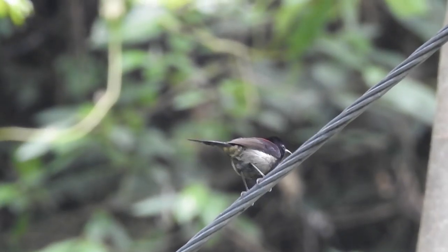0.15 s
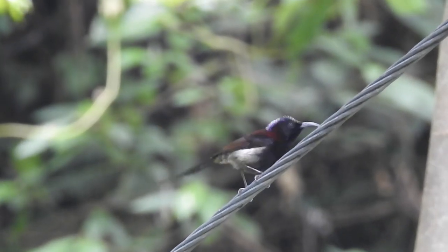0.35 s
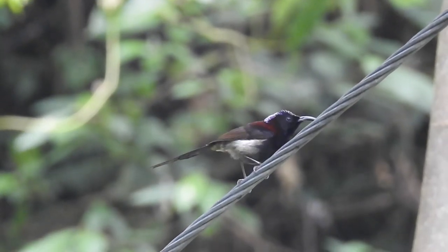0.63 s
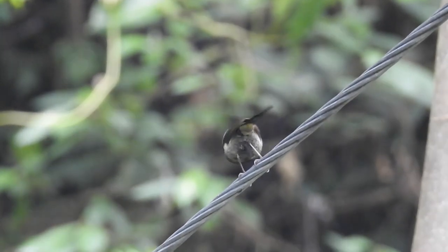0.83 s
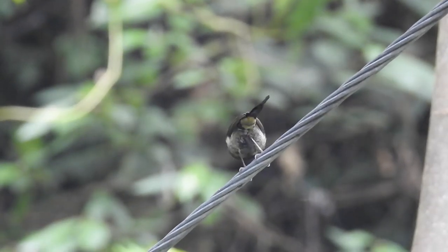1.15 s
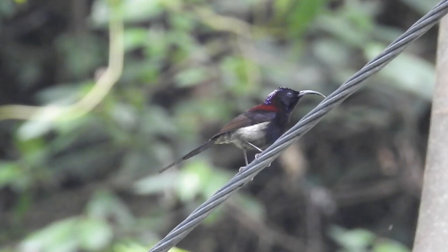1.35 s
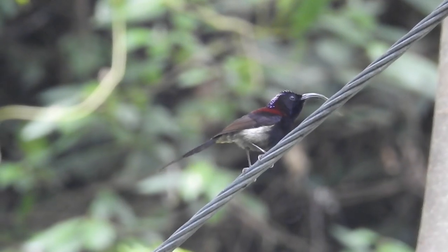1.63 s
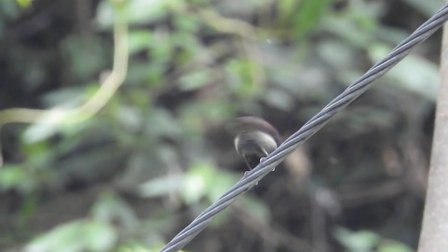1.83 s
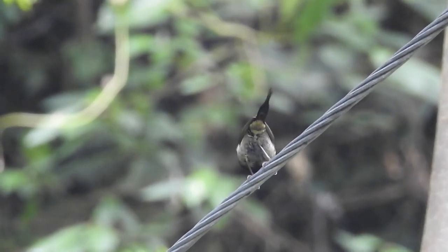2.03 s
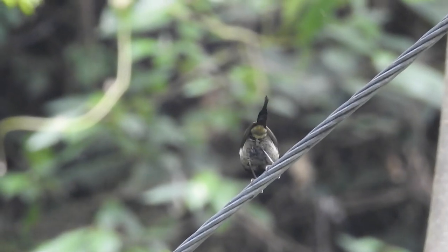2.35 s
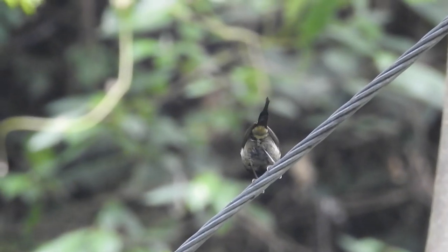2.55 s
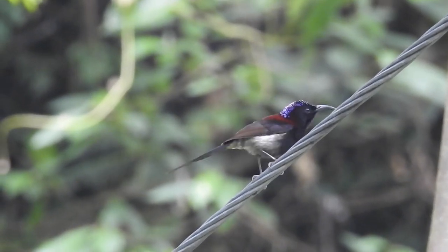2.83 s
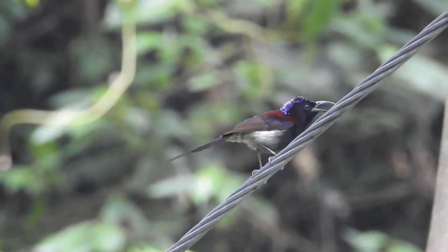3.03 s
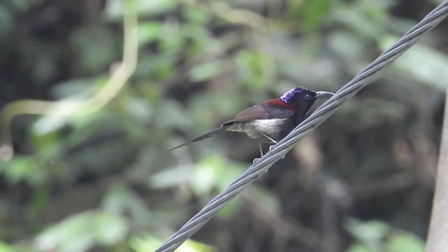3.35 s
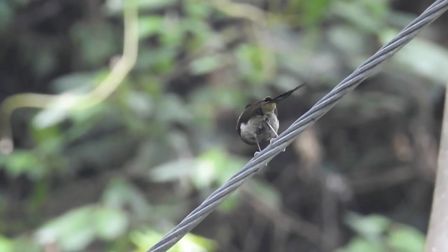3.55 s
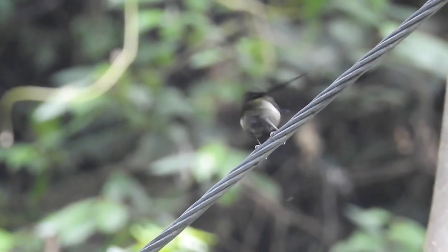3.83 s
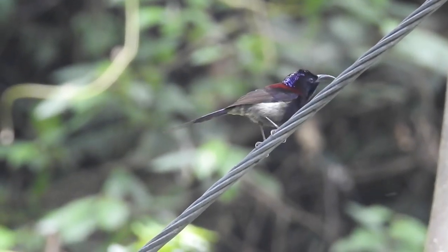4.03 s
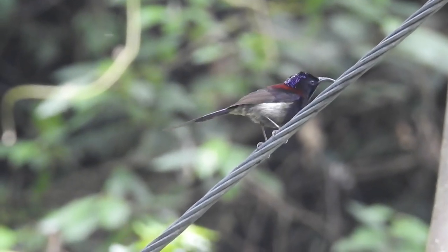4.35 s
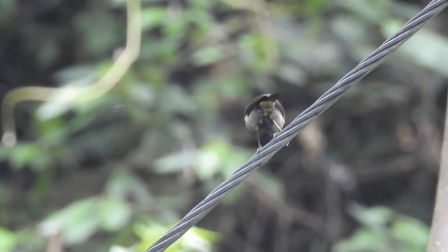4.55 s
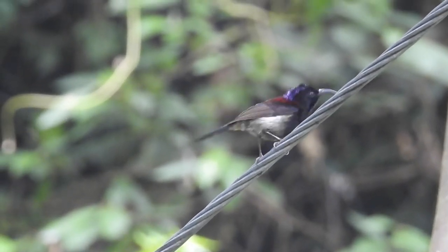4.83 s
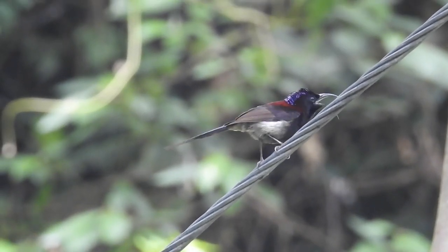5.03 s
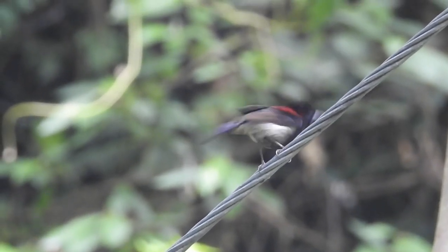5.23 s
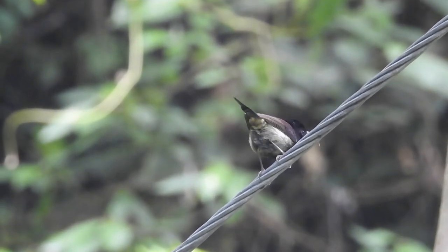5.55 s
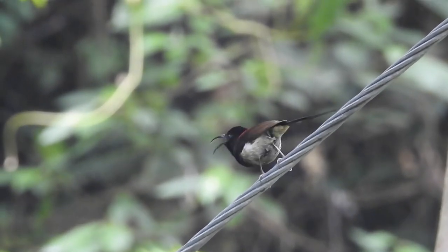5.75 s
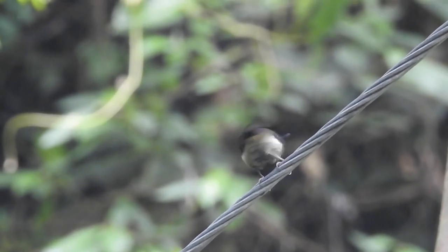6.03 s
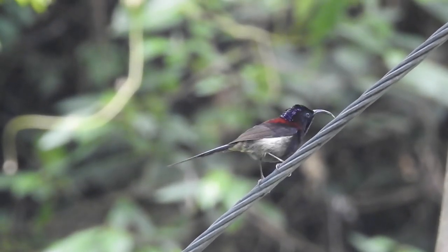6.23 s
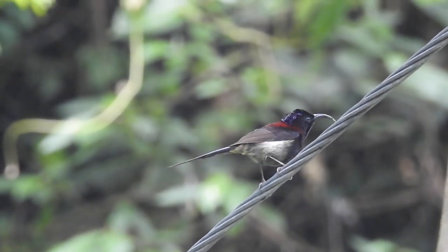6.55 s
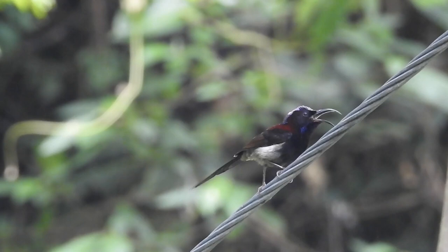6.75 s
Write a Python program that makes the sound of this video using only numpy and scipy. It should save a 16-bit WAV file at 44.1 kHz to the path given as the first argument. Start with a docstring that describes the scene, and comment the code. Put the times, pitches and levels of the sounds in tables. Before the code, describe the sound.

A small sunbird on a wire gives thin piercing whistles and sharp chips while other birds ticking and whistling sound behind, over steady insect hiss.

```python
"""On a wooded slope a sunbird on a wire calls in thin arched whistles, slurs and sharp double chips.
Each note is a gliding sine, and decaying random echoes stand for scatter in the foliage.
Farther off, other birds tick, pip, trill and whistle two climbing series, made the same way.
Insects hiss steadily near 6 kHz above a low, distant rumble; both are noise shaped by a spectrum."""
import sys
import numpy as np
from scipy import signal
from scipy.fft import rfft, irfft, next_fast_len
from scipy.io import wavfile
from scipy.ndimage import uniform_filter1d, minimum_filter1d, map_coordinates

SR = 44100
rng = np.random.default_rng(int(sys.argv[2]) if len(sys.argv) > 2 else 0)


def transcribe(u):
    """Save the signal u as a 16-bit wav file named by the first command-line argument.

    u: samples, shape (n,) or (channels, n), limited to [-1, 1]; the rate is SR.
    q: integer samples, one column per channel.
    """
    v = np.clip(np.atleast_2d(u).T, -1, 1)
    q = np.round(v * 32767).astype(np.int16)
    wavfile.write(sys.argv[1], SR, q)


N = 303408

# In every note table, pitch and level are references that the note's shape multiplies and offsets.


def sunbird():
    """Superposition: whistles, slurs and chips add linearly, then lean left by a level difference."""
    whistles = arched_whistles() + high_whistles() + lifting_whistles()
    return panned(whistles + slurs() + double_chips() + drops(), left_db=2.5)


# Arched glide. Each row: share of the note's length, pitch ratio, level in dB.
ARCH_SHAPE = [(0, .73, -30), (.09, .86, -13), (.18, .955, -3), (.3, 1.003, .5), (.6, .998, -1),
              (.86, .988, 0), (.95, .97, -1), (1, .9, -12)]
# Arched whistles. Each row: start in seconds, pitch in Hz, level in dB.
ARCHES = [(0.889, 6326, -9.5), (2.167, 6410, -10), (3.049, 6252, -10.5), (3.825, 6197, -9),
          (4.02, 6280, -12), (6.143, 6284, -9.5)]
ARCH_S = .099


def arched_whistles():
    """Frequency modulation: the pitch rises fast, is held, and sags at the end."""
    rows = [(s, ARCH_S, hz, db) for s, hz, db in ARCHES]
    return calls(ARCH_SHAPE, rows, waver=.0035, wet_db=0, late_db=-6, rasp=.015)


# Glide that starts high. Each row: share of the note's length, pitch ratio, level in dB.
HIGH_SHAPE = [(0, 1.07, -24), (.07, 1.055, -11), (.15, 1, -4), (.27, .992, -2), (.45, 1.002, 0),
              (.68, .988, -3), (.8, .975, 0), (.92, .95, 0), (1, .955, -10)]
# High whistles. Each row: start in seconds, length in seconds, pitch in Hz, level in dB.
HIGH_NOTES = [(1.934, 0.13, 7540, -9.5), (3.592, 0.14, 7442, -11.5), (6.74, .137, 7387, -10.5)]


def high_whistles():
    """Frequency modulation: the pitch falls early, is nearly held, and falls again."""
    return calls(HIGH_SHAPE, HIGH_NOTES, waver=.002, wet_db=-3, late_db=-7)


# Rising glide. Each row: share of the note's length, pitch ratio, level in dB.
LIFT_SHAPE = [(0, .88, -24), (.14, .94, -8), (.3, .97, -2), (.6, .995, -3), (.88, 1.01, 1), (1, 1, -16)]
# Lifting whistle. Each row: start in seconds, length in seconds, pitch in Hz, level in dB.
LIFT_NOTES = [(5.051, .092, 7366, -11)]


def lifting_whistles():
    """Frequency modulation: the pitch climbs for most of the note."""
    return calls(LIFT_SHAPE, LIFT_NOTES, waver=.002, wet_db=-1, late_db=-5)


# Warbling and sweeping glides. Each row: share of the note's length, pitch ratio, level in dB.
WARBLE_SHAPE = [(0, .87, -18), (.13, .93, -7), (.26, .875, -8), (.42, .9, -5), (.57, 1.02, -3), (.85, 1, 0),
                (.93, .99, 0), (1, .95, -12)]
SWEEP_SHAPE = [(0, .62, -20), (.07, .68, -15), (.13, .77, -12), (.2, .97, -5), (.3, 1.01, -1),
               (.5, 1.06, 0), (.7, 1.14, -6), (.9, 1.24, -7), (1, 1.23, -20)]
# Slurs of each shape. Each row: start in seconds, length in seconds, pitch in Hz, level in dB.
WARBLE_NOTES = [(0.516, .098, 5906, -11), (4.798, .115, 5938, -10)]
SWEEP_NOTES = [(0.475, 0.18, 5977, -13)]


def slurs():
    """Frequency modulation: wide glides, with a stronger random waver than the held whistles."""
    warbles = calls(WARBLE_SHAPE, WARBLE_NOTES, waver=.0071, wet_db=-.5, late_db=-4.5)
    sweeps = calls(SWEEP_SHAPE, SWEEP_NOTES, waver=.0089, wet_db=5.5, late_db=-9)
    return warbles + sweeps


# Lead-in and upward flick. Each row: share of the note's length, pitch ratio, level in dB.
LEAD_SHAPE = [(0, .73, -18), (.2, .93, -2), (.4, 1, 0), (.7, 1.09, -2), (.85, 1.2, -13), (1, 1.4, -24)]
FLICK_SHAPE = [(0, .69, -14), (.3, .87, 4), (.52, 1, 7), (.72, 1.09, 10), (.9, 1.16, 5), (1, 1.13, -14)]
# Double chips. Each row: start of the lead-in in seconds, its pitch in Hz, its level in dB.
DOUBLE_CHIPS = [(-.2, 7050, -13.5), (.326, 6760, -16), (2.789, 6270, -15), (4.619, 6480, -14.5),
                (5.83, 6340, -16)]
LEAD_S, FLICK_AFTER_S, FLICK_S, FLICK_HZ = .045, .041, .028, 6490
FLICK_DB = -3.5  # relative to the lead-in's reference level


def double_chips():
    """Transient pairs: a short rising lead-in, then a faster upward flick on a fixed pitch."""
    lead_rows = [(s, LEAD_S, hz, db) for s, hz, db in DOUBLE_CHIPS]
    flick_rows = [(s + FLICK_AFTER_S, FLICK_S, FLICK_HZ, db + FLICK_DB) for s, _, db in DOUBLE_CHIPS]
    leads = calls(LEAD_SHAPE, lead_rows, waver=.035, wet_db=3, late_db=-16, rasp=.21)
    flicks = calls(FLICK_SHAPE, flick_rows, waver=.015, wet_db=1.5, late_db=-8, rasp=.11)
    return leads + flicks


# Falling glide. Each row: share of the note's length, pitch ratio, level in dB.
DROP_SHAPE = [(0, 1.6, -26), (.2, 1.28, -7), (.32, 1.08, 0), (.55, .9, -1), (.75, .83, -6), (1, .81, -18)]
# Drops. Each row: start in seconds, length in seconds, pitch in Hz, level in dB.
DROP_NOTES = [(1.546, .038, 5440, -13), (5.333, .046, 5370, -16)]


def drops():
    """Frequency modulation: a short note falls to about half its starting pitch."""
    return calls(DROP_SHAPE, DROP_NOTES, waver=.025, wet_db=0, late_db=-7, rasp=.12)


def other_birds():
    """Superposition: the neighbours' notes add linearly, then lean left by a level difference."""
    short_notes = ticks() + chips() + rasps() + pips()
    long_notes = peeps() + piping_trill() + climbing_whistles() + thin_whistles()
    return panned(short_notes + long_notes, left_db=2.4)


# Tick that falls and fades. Each row: share of the note's length, pitch ratio, level in dB.
TICK_SHAPE = [(0, 1.0, -16), (.15, 1.015, 0), (.4, .975, 0), (.58, .85, -13), (.8, .68, -23), (1, .52, -33)]
# Ticks. Each row: start in seconds, length in seconds, pitch in Hz, level in dB.
TICK_NOTES = [(.949, .028, 4450, -13), (1.012, .029, 4370, -14), (1.108, .029, 4500, -14),
              (1.192, .027, 4500, -14.5)]


def ticks():
    """Direct-to-reverberant ratio: weak scatter makes four ticks sound dry and close."""
    return calls(TICK_SHAPE, TICK_NOTES, waver=.014, wet_db=-3.5, late_db=-5, rasp=.1, side_db=-11)


# Chips. Each row: start in seconds, length in seconds, pitch in Hz, level in dB.
CHIP_NOTES = [(1.622, 0.034, 3900, -34.5), (1.695, .022, 6035, -33.5), (1.697, .018, 3210, -43),
              (5.411, .022, 3800, -37)]


def chips():
    """Direct-to-reverberant ratio: scatter above the direct sound sets these flicks deep in the trees."""
    return calls(FLICK_SHAPE, CHIP_NOTES, waver=.027, wet_db=3.5, late_db=-5.5, rasp=.16)


# Rising pip. Each row: share of the note's length, pitch ratio, level in dB.
PIP_SHAPE = [(0, .85, -12), (.35, .94, -1), (.7, .99, 0), (1, 1.02, -7)]
# Rasps. Each row: start in seconds, length in seconds, pitch in Hz, level in dB.
RASP_NOTES = [(1.84, .045, 5690, -26), (2.059, 0.047, 4370, -41), (2.383, 0.14, 4866, -36),
              (3.619, .05, 3400, -47.5), (5.527, 0.023, 5310, -25.5), (6.817, 0.027, 6120, -21.5)]


def rasps():
    """Phase noise: strong random modulation spreads the tone into a harsh band."""
    return calls(PIP_SHAPE, RASP_NOTES, waver=.11, wet_db=2, late_db=-11, rasp=.32)


# Bouts of pips. Each row: first pip in seconds, last pip in seconds, pitch in Hz, level in dB.
PIP_BOUTS = [(0.307, 0.824, 3940, -32), (4.64, 4.895, 3940, -35.5), (6.55, 6.801, 3985, -35)]
PIP_GAP_S, PIP_S = .26, .046  # the gap is adjusted to fit the bout evenly


def pips():
    """Periodic repetition: like rising pips fill every bout at a steady pace."""
    rows = []
    for first, last, hz, db in PIP_BOUTS:
        count = 1 + round((last - first) / PIP_GAP_S)
        rows += [(s, PIP_S, hz, db) for s in np.linspace(first, last, count)]
    return calls(PIP_SHAPE, rows, waver=.012, wet_db=4, late_db=-2, rasp=.08)


# Nearly level whistle. Each row: share of the note's length, pitch ratio, level in dB.
WHISTLE_SHAPE = [(0, .982, -14), (.25, .99, -3), (.6, 1, 0), (.85, 1.003, -1), (1, .992, -12)]
# Soft low peeps. Each row: start in seconds, level in dB.
PEEPS = [(0.147, -41.5), (.43, -43), (0.691, -43), (4.51, -46), (6.37, -41), (6.68, -44.5)]
PEEP_S, PEEP_HZ = .07, 3300


def peeps():
    """Reverberant masking: scatter, mostly its long tail, outweighs each soft tone."""
    rows = [(s, PEEP_S, PEEP_HZ, db) for s, db in PEEPS]
    return calls(WHISTLE_SHAPE, rows, waver=.035, wet_db=3, late_db=4)


# Hoot with an early flip in pitch. Each row: share of the note's length, pitch ratio, level in dB.
HOOT_SHAPE = [(0, .995, -9), (.14, 1.005, 0), (.22, 1.06, -9), (.3, 1.01, 0), (.6, 1.005, -1), (1, .99, -8)]
TRILL_START_S, TRILL_GAP_S, HOOT_S, HOOT_HZ = -.093, .109, .085, 2139
TRILL_DB, TRILL_SWELL_DB = -34.5, 1.5  # first hoot's level, and the rise to the last


def piping_trill(count=7):
    """Periodic repetition: quick hoots on one pitch, each a little louder."""
    rows = []
    for k in range(count):
        level = TRILL_DB + TRILL_SWELL_DB * k / (count - 1)
        rows.append((TRILL_START_S + k * TRILL_GAP_S, HOOT_S, HOOT_HZ, level))
    return calls(HOOT_SHAPE, rows, waver=.004, wet_db=-2, late_db=0, late_t60=1.15, side_db=-9.5)


# Climbing series of whistles. Each row: start in seconds, level in dB.
SERIES = [(1.613, -27), (4.75, -28)]
WHISTLE_GAP_S, WHISTLE_S, WHISTLE_HZ = .241, .0897, 2806
CLIMB_HZ, CLIMB_POWER = 487, 2.2  # from first note to last; the climb steepens
STRAY_HZ, STRAY_DB = 15.9, .74  # standard deviations: no two whistles are quite alike
UPPER_AFTER_S, UPPER_S = .048, .05  # a higher syllable overlaps each whistle
UPPER_RATIO, UPPER_TOP_HZ = 1.155, 3580  # its reference pitch over the whistle's, and the cap on it
UPPER_DB, UPPER_GROWS_DB = -15, 8.5  # its level over the whistle's, and its growth through the series


def climbing_whistles(count=6):
    """Accelerating glissando in steps: an even beat, a steepening climb and a growing upper syllable."""
    lower, upper = [], []
    for start, db in SERIES:
        for k, u in enumerate(np.linspace(0, 1, count)):
            tune, loud = rng.standard_normal(2)
            s = start + k * WHISTLE_GAP_S
            hz = WHISTLE_HZ + CLIMB_HZ * u ** CLIMB_POWER + STRAY_HZ * tune
            level = db + STRAY_DB * loud
            lower.append((s, WHISTLE_S, hz, level))
            upper_hz = min(hz * UPPER_RATIO, UPPER_TOP_HZ)
            upper_level = level + UPPER_DB + UPPER_GROWS_DB * u
            upper.append((s + UPPER_AFTER_S, UPPER_S, upper_hz, upper_level))
    whistles = calls(WHISTLE_SHAPE, lower, waver=.006, wet_db=0, late_db=5, late_t60=1.3,
                     rasp=.035, side_db=-8)
    overlaps = calls(WHISTLE_SHAPE, upper, waver=.033, wet_db=3, late_db=7.5, late_t60=1.6, side_db=-11)
    return whistles + overlaps


# Faint thin whistles. Each row: start in seconds, length in seconds, pitch in Hz, level in dB.
THIN_NOTES = [(1.245, 0.16, 7740, -51), (1.79, 0.084, 7620, -48)]


def thin_whistles():
    """Reverberant field: scatter far above the direct sound blurs these faint high tones."""
    return calls(WHISTLE_SHAPE, THIN_NOTES, waver=.011, wet_db=8.5, late_db=-.5)


def background():
    """Superposition: insects, distant rumble and faint air add as independent noises."""
    return insect_chorus() + distant_rumble() + air_hiss()


# Insect spectrum. Each row: frequency in Hz, relative density in dB per Hz.
INSECT_SPECTRUM = [(1800, -46.5), (2600, -26.5), (3500, -25), (4200, -18.5), (4800, -17.5), (5550, -8),
                   (6150, 0), (6550, -11), (7000, -21.5), (8200, -38.5), (10000, -46.5)]


def insect_chorus():
    """Narrow-band noise: a hiss peaking near 6 kHz shimmers in level, with tiny strokes inside it."""
    shimmer_db = 1.1 * wobble(2, N) + 1.7 * wobble(35, N)
    hiss = amp(-37 + shimmer_db) * rush(INSECT_SPECTRUM, side_db=-1)
    high_strokes = twitter(hz=6100, rate=22, db=-42, length=.022)
    low_strokes = twitter(hz=4800, rate=23, db=-47, length=.018)
    return hiss + high_strokes + low_strokes


def twitter(hz, rate, db, length):
    """Jittered pulse train: tiny falling strokes, rate a second, vary in time, pitch and level."""
    out = np.zeros(N + SR)
    fall = [(0, 1.06, -8), (.4, 1, 0), (1, .9, -8)]  # share of length, pitch ratio, level in dB
    for k, (late, tune, loud) in enumerate(rng.standard_normal((int(N / SR * rate), 3))):
        stroke = amp(db + 2 * loud) * note(fall, length, hz * (1 + .02 * tune), waver=.011)
        start = int(abs(k + .15 * late) / rate * SR)
        out[start:start + len(stroke)] += stroke
    swelling = out[:N] * amp(2 * wobble(3, N))
    return foliage(swelling, wet_db=-3, late_db=-8, late_t60=.6)[:, :N]


# Rumble spectrum. Each row: frequency in Hz, relative density in dB per Hz.
RUMBLE_SPECTRUM = [(15, -53.5), (25, -38.5), (65, -2), (156, 1), (232, -2.5), (294, -8), (393, -8.5),
                   (438, -12), (629, -13), (727, -21), (811, -19.5), (1100, -28.5), (1900, -38.5),
                   (2470, -82.5), (4180, -120)]


def distant_rumble():
    """Low-frequency noise: mostly below 700 Hz, its level wavers and it leans left."""
    level = amp(-36.5 + 1.5 * wobble(6.1, N))
    return panned(level * rush(RUMBLE_SPECTRUM, side_db=-17.5), left_db=1.47)


# Air spectrum. Each row: frequency in Hz, relative density in dB per Hz.
AIR_SPECTRUM = [(1000, 8), (2500, 2), (8000, -2), (11000, -6.5), (15500, -11)]


def air_hiss():
    """Broadband noise: a faint steady hiss that falls toward the treble."""
    return amp(-57) * rush(AIR_SPECTRUM, side_db=-5)


def calls(shape, rows, waver, wet_db, late_db, late_t60=.76, rasp=0, side_db=-3):
    """Multipath propagation: the bird turns between notes, so each takes new paths through the leaves."""
    out = np.zeros((2, N))
    for s, length, hz, db in rows:
        direct = amp(db) * note(shape, length, hz, waver, rasp)
        add(out, s, foliage(direct, wet_db, late_db, late_t60, side_db))
    return out


def note(shape, length, hz, waver, rasp=0):
    """Syrinx: a nearly pure tone glides with membrane tension and swells with air pressure."""
    size = int(length * SR)
    u = np.linspace(0, 1, size)
    share, ratio, db = np.transpose(shape)
    pitch = hz * uniform_filter1d(np.interp(u, share, ratio), size=160, mode="nearest")
    phase = 2 * np.pi * np.cumsum(pitch * (1 + waver * wobble(450, size))) / SR
    to_edge_s = np.minimum(u, 1 - u) * length
    edges = np.sin(np.pi / 2 * np.clip(to_edge_s / .002, 0, 1)) ** 2  # 2 ms fades
    pressure = amp(np.interp(u, share, db) + .57 * wobble(82, size)) * edges
    # Irregular vibration spreads a skirt of noise around a harsh note.
    phase += rasp * (wobble(3000, size) + .16 * wobble(8000, size))
    return np.sqrt(2) * pressure * np.sin(phase)


def foliage(x, wet_db, late_db, late_t60, side_db=-3):
    """Scattering: direct sound, quick echoes from near leaves and a longer tail from the wooded slope."""
    t = np.arange(int(.9 * SR)) / SR
    near_t60 = .2  # seconds to fall by 60 dB
    near, late = amp(-60 * t / near_t60), amp(-60 * t / late_t60)
    onset = 1 - np.exp(-t / .003)
    fade = (unit(near) + amp(late_db) * unit(late)) * onset
    paths = amp(wet_db) * noise_pair(side_db, len(t)) * fade / np.linalg.norm(fade)
    paths[:, 0] += 1  # the direct sound
    # Divide by the root of direct plus scattered energy.
    return signal.fftconvolve(x[None], paths, axes=1) / np.sqrt(1 + amp(2 * wet_db))


def rush(spectrum, side_db):
    """Spectral shaping: stereo noise of rms 1, its dB curve interpolated over log frequency."""
    f, db = np.transpose(spectrum)
    white = noise_pair(side_db, N)
    return unit(filtered(white, lambda hz: amp(np.interp(np.log(hz + 1), np.log(f), db))))


def noise_pair(side_db, size):
    """Spatial coherence: white noise at two close microphones, more shared as side_db falls."""
    mid, side = rng.standard_normal((2, size))
    return unit(np.array([mid + amp(side_db) * side, mid - amp(side_db) * side]))


def filtered(x, response):
    """Convolution theorem: multiply the spectrum by a response of frequency in Hz."""
    m = next_fast_len(N + 8192)
    return irfft(rfft(x, m) * response(np.fft.rfftfreq(m, 1 / SR)), m)[..., :N]


def wobble(rate, size):
    """Spline interpolation: a smooth random curve with rate knots a second."""
    knots = rng.standard_normal(int(size * rate / SR) + 4)
    return map_coordinates(knots, [np.arange(size) * rate / SR])


def panned(x, left_db):
    """Interaural level difference: the left gains and the right loses half of left_db."""
    return x * amp([[left_db / 2], [-left_db / 2]])


def add(out, s, sound):
    """Superposition: mix in a stereo sound at s seconds, cutting whatever falls outside."""
    start = round(s * SR)
    sound, start = sound[:, max(-start, 0):], max(start, 0)
    out[:, start:start + sound.shape[1]] += sound[:, :max(N - start, 0)]


def amp(db):
    """Logarithmic level: decibels to amplitude gain."""
    return 10 ** (np.asarray(db) / 20)


def unit(x):
    """Energy normalization: scale to rms 1."""
    return x / np.sqrt(np.mean(x ** 2) + 1e-20)


def scene():
    """Superposition: the sunbird in front of its neighbours and the forest."""
    return sunbird() + other_birds() + background()


def record(dry):
    """Peak limiting and band limiting: gain snaps down on peaks and holds; the top treble is cut."""
    ceiling, hold, top_hz = .8, 441, 15800  # amplitude, samples (10 ms), Hz
    needed = np.minimum(1, ceiling / (np.abs(dry).max(axis=0) + 1e-9))
    held = minimum_filter1d(needed, size=hold, origin=hold // 2)
    gain = uniform_filter1d(held, size=3)
    return filtered(dry * gain, lambda hz: hz < top_hz)


dry = scene()
out = record(dry)
transcribe(out)
```